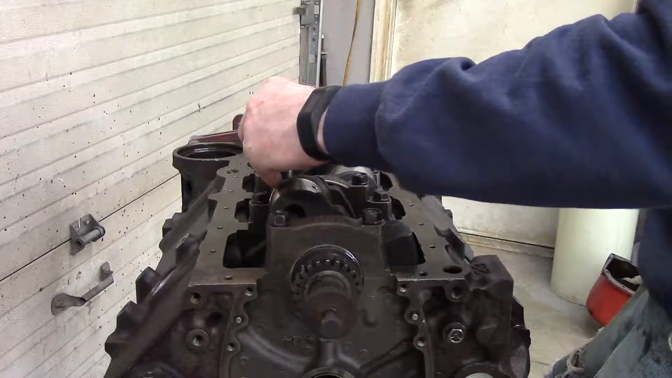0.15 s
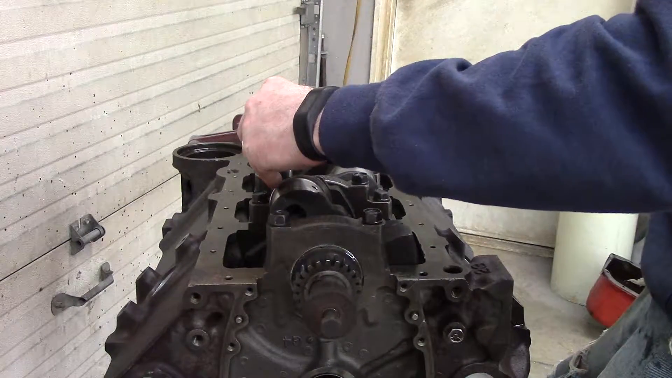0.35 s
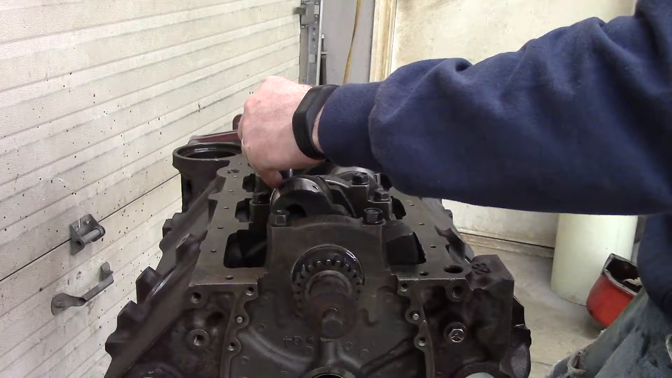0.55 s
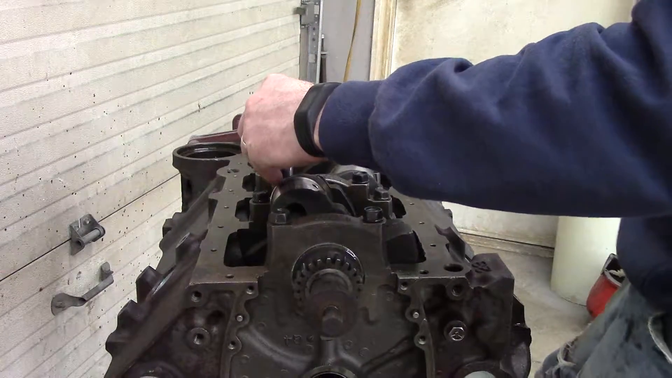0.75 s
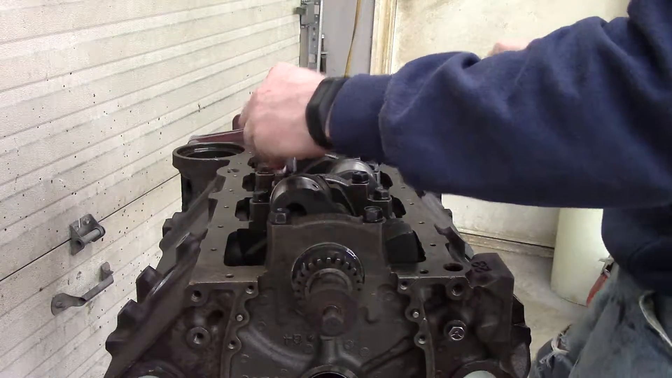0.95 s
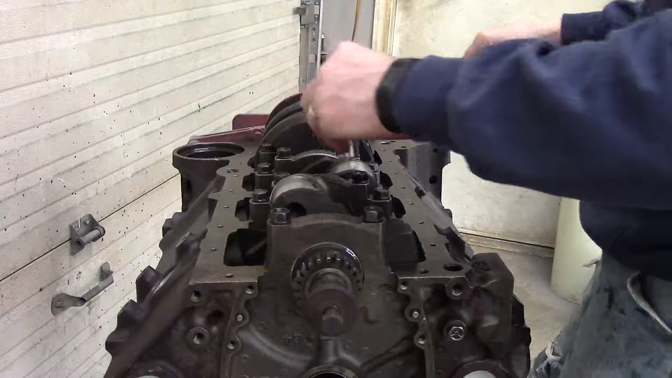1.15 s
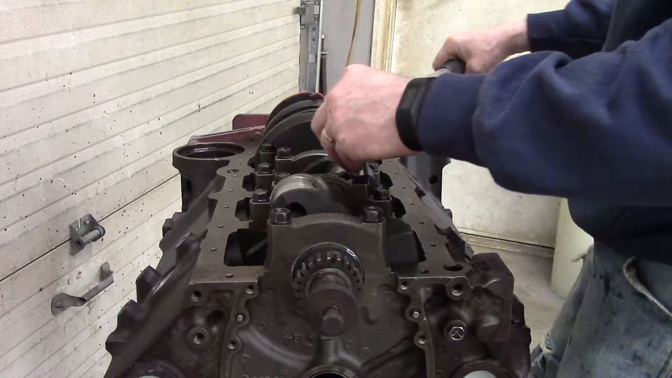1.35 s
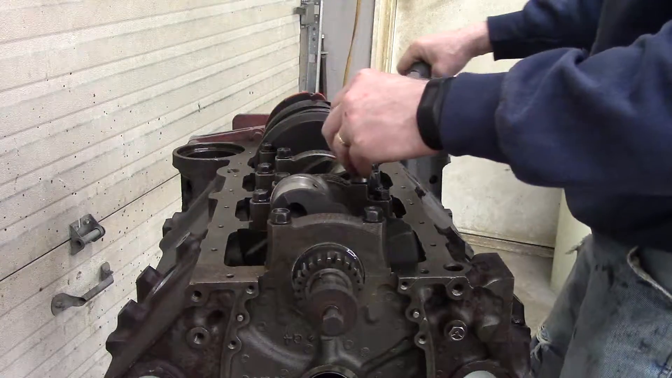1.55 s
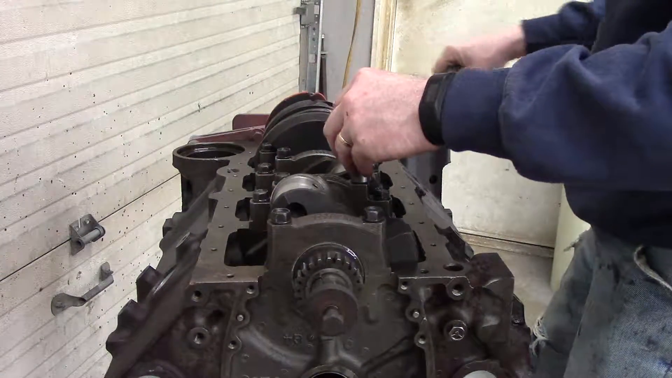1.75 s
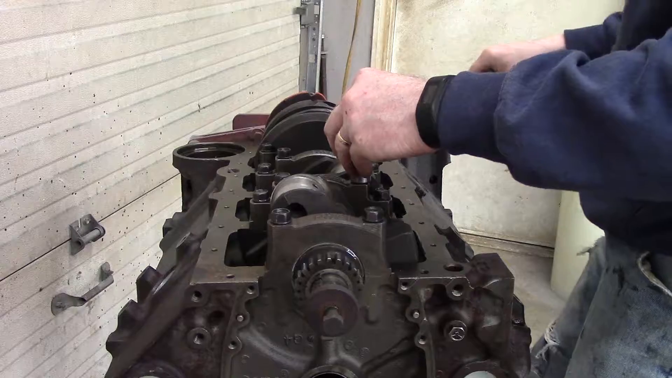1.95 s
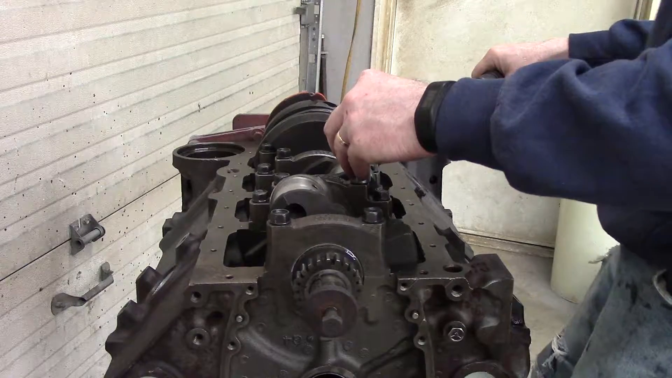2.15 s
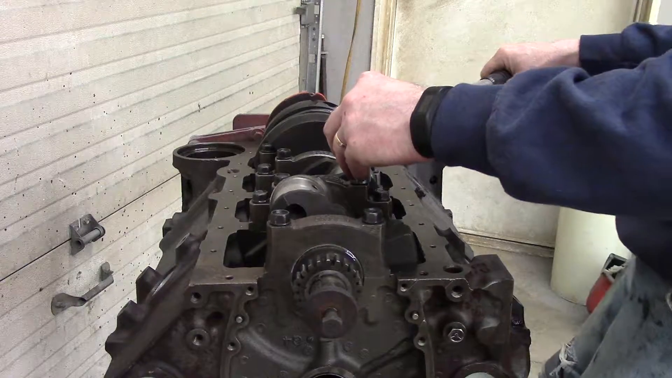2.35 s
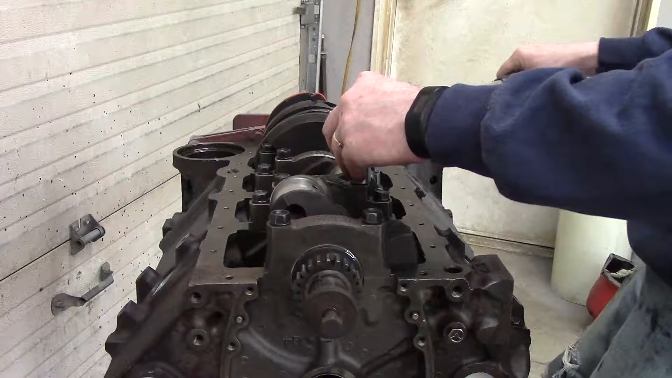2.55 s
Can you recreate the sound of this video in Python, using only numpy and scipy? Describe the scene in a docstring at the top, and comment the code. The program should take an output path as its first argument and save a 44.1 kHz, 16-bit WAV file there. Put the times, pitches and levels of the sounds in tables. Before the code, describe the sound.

A torque wrench gives a loud steel snap at about 0.25 seconds and snaps back at 0.7, each ringing briefly in a hard-walled garage. The socket clinks softly off the bolt around 1 second, then clinks onto the next from 1.35 to 1.5 seconds. A few much fainter ticks follow from 1.8 seconds on. A faint electrical hum and thin whine lie underneath throughout.

```python
"""A loud steel snap, a second snap, then light clinks, all ringing on in a hard-walled garage.
A click-type torque wrench tightens a bearing-cap bolt on an engine block: it snaps over, then snaps
back as the pull eases. The socket is lifted off and clinks onto the next bolt. Each knock of steel
on steel makes the parts ring and the room echo. Behind it lie a faint electrical hum and whine."""
import sys
import numpy as np
from scipy import signal
from scipy.fft import rfft, irfft, next_fast_len
from scipy.io import wavfile
from scipy.ndimage import map_coordinates

SR = 44100
rng = np.random.default_rng(int(sys.argv[2]) if len(sys.argv) > 2 else 0)


def wav_out(sig):
    """Save sig, one row per channel (or a flat mono array), as 16-bit PCM at SR to the path in sys.argv[1]."""
    wavfile.write(sys.argv[1], SR, np.round(np.clip(np.atleast_2d(sig).T, -1, 1) * 32767).astype(np.int16))


N = 114660


def amp(db):
    """Turn decibels into a factor to multiply by."""
    return 10 ** (np.asarray(db) / 20)


def unit(x):
    """Scale x to an average power of one."""
    return x / np.sqrt(np.mean(x ** 2) + 1e-20)


def along(points, hz):
    """Read a curve of (f/Hz, value) points at hz, on a log frequency axis."""
    f, v = np.transpose(points)
    return np.interp(np.log(hz + 1), np.log(f + 1), v)


def wobble(rate):
    """A smooth curve through `rate` random values a second."""
    return map_coordinates(rng.standard_normal(4096), [np.arange(N) * rate / SR + 2], mode="wrap")


def filtered(x, response):
    """Multiply each frequency in x by response(hz)."""
    size = next_fast_len(x.shape[-1] + SR // 2)
    return irfft(rfft(x, size) * response(np.fft.rfftfreq(size, 1 / SR)), size)[..., :x.shape[-1]]


def add(out, start, x):
    """Mix x into out, beginning at `start` seconds."""
    part = out[:, round(start * SR):][:, :x.shape[-1]]
    part += x[..., :part.shape[1]]


def stereo(pair, side_db):
    """Make left and right from a middle signal and a weaker side signal."""
    return pair[0] + amp(side_db) * np.array([pair[1], -pair[1]])


def background():
    """Soft room air, mains hum and a thin whine that swells now and then."""
    # tone colour of the room air: f/Hz, relative level/dB
    air_colour = [(15, -69), (25, -34.5), (108, -10.5), (149, -13), (242, -11.5), (326, -9.5), (354, -7.5),
                  (591, -13), (641, -14), (818, -14), (2220, -21.5), (5280, -28), (5730, -24.5),
                  (6380, -29), (16000, -37.5)]
    # tones of the mains hum: f/Hz, level/dB
    hum_tones = [(120, -78), (240, -80.5), (360, -72.5), (480, -77.5), (600, -77), (840, -81.5),
                 (1590, -77.5)]
    # starts of the whine's swells: t/s
    swell_starts = [0.214, 1.797, 1.865, 2.312, 2.395, 2.464, 2.548]
    air_top_hz, whine_hz, swell_s = 14600, 5530, .033
    t = np.arange(N) / SR
    noise = rng.standard_normal((2, N))
    air = unit(filtered(noise, lambda hz: amp(along(air_colour, hz)) / (1 + (hz / air_top_hz) ** 8)))
    hum = sum(amp(db + 2.8 * wobble(13)) * np.sin(2 * np.pi * hz * t + 0.28 * wobble(3.3))
              for hz, db in hum_tones)
    swell = sum(np.exp(-(2 * (t - start) / swell_s - 1) ** 6) for start in swell_starts)
    whine_level = amp(-80.5 + 11.5 * swell + 2.5 * wobble(22))
    whine = whine_level * np.sin(2 * np.pi * whine_hz * t + .6 * wobble(30))
    return stereo(air, side_db=-7) * amp(-60.5 + 0.99 * wobble(9.1)) + np.sqrt(2) * (hum + whine)


def garage_tail(room_db):
    """Echoes off the hard walls blend into fading noise; returns middle and side."""
    # time the room takes to fade by 60 dB (called t60): f/Hz, t60/s
    fade_times = [(150, 0.44), (500, 0.5252), (1200, 0.78), (2500, 0.76), (6000, 0.59), (9000, .5),
                  (14000, 0.39)]
    # tone colour of the echoes: f/Hz, relative level/dB
    colour = [(150, -7.5), (500, -6.5), (1200, -15.5), (2500, -13.5), (6000, -11.5), (9000, -16.5),
              (14000, -15.5)]
    t = np.arange(SR) / SR
    hz, when, bands = signal.stft(rng.standard_normal((2, SR)), SR, nperseg=256)
    fade = amp(along(colour, hz)[:, None] + room_db - 60 * when / along(fade_times, hz)[:, None])
    return signal.istft(bands * fade, SR, nperseg=256)[1][:, :SR] * (1 - np.exp(-t / .008))


def standing_waves():
    """Low notes of the room that build up between the walls after a snap."""
    # the room's low notes: f/Hz, level/dB, build-up/s, t60/s
    notes = [(197, -28, 0.092, .44), (65, -55, .05, 0.7)]
    t = np.arange(SR) / SR
    return sum(amp(db - 60 * t / t60) * (1 - np.exp(-t / rise)) ** 2 * np.sin(2 * np.pi * hz * t)
               for hz, db, rise, t60 in notes)


def thump(level_db=-56, top_hz=110, t60=.14):
    """A short, dull low thump sounds with each snap."""
    rumble = unit(filtered(rng.standard_normal(SR), lambda hz: 1 / (1 + (hz / top_hz) ** 2)))
    return rumble * amp(level_db - 60 * np.arange(SR) / SR / t60)


def ring(modes):
    """Struck metal rings at its own tones, or modes (f/Hz, level/dB, t60/s), blurred by close ones."""
    t = np.arange(SR) / SR
    blur_rate = 44  # random values a second
    out = np.zeros(SR)
    for hz, db, t60 in modes:
        phase_blur = 1.1 * wobble(blur_rate)[:SR]
        flutter_db = 2.97 * wobble(blur_rate)[:SR]
        out += amp(db + flutter_db - 60 * t / t60) * np.sin(2 * np.pi * hz * t + phase_blur)
    return out * (1 - np.exp(-t / 0.00033))


def crack(colour, tilt, edge_hz, size=2048):
    """One sharp pulse; tilt (dB per octave) brightens it, and a softer knock has a lower edge_hz."""
    radiate_hz = 450  # small steel parts give off little sound below this
    hz = np.fft.rfftfreq(size, 1 / SR)
    gain = amp(along(colour, hz) + tilt * np.log2(hz + 500)) / np.sqrt(1 + (hz / edge_hz) ** 4)
    gain = gain * (hz + 100) / np.hypot(hz + 100, radiate_hz)
    # keep the colour but pack the energy at the start (minimum phase)
    cepstrum = irfft(np.log(gain))
    cepstrum[1:size // 2] *= 2
    cepstrum[size // 2 + 1:] = 0
    pulse = irfft(np.exp(rfft(cepstrum)))
    return pulse / np.linalg.norm(pulse)


def contact(colour, tilt, edge_hz, steel_t60, near_db, near_t60, room_db, spike_db):
    """Steel hits steel: a spike, a dense short ring, echoes off block and near wall, then the garage."""
    t = np.arange(SR) / SR
    tail = garage_tail(room_db)
    steel = rng.standard_normal((2, SR)) * amp(-60 * t / steel_t60)
    steel[0, 0] += amp(spike_db)
    bounces = unit(rng.standard_normal((2, SR)) * (rng.random(SR) < .06))
    echoes = bounces * amp(near_db - 60 * t / near_t60) * (1 - np.exp(-t / 0.0016))
    pulses = [crack(colour, tilt, edge_hz), crack(colour, tilt + 2, edge_hz)]  # middle, brighter side
    middle_and_side = signal.fftconvolve(steel + echoes + tail, pulses, axes=1)[:, :SR]
    return stereo(middle_and_side, side_db=-17)


def socket():
    """The socket slips off one bolt and drops onto the next, ringing at each touch."""
    # touches on the bolt heads: t/s, level/dB, tilt/(dB per octave), treble edge/Hz, relative ring/dB
    clinks = [(0.920, -43.5, 3, 9000, -10), (0.992, -37.5, -7, 6000, -10), (0.999, -38, -1, 11000, -9),
              (1.3473, -34, -0.5, 6000, 0), (1.3504, -37.5, -2, 5500, 0.5), (1.368, -43, -2, 4480, 0.5),
              (1.4608, -32, -0.5, 8000, -6.5), (1.4653, -34.5, 0, 8000, -6),
              (1.4854, -27.5, 1.5, 12000, -2), (1.4890, -28.5, 0.5, 12000, -5.5),
              (1.4935, -30.5, 4, 9000, -5), (1.801, -49, -3.5, 5000, -9), (1.909, -54.5, -2.5, 2580, -13.5),
              (2.25, -62, -2, 3000, -14.5), (2.448, -64, -3, 2500, -14.5)]
    # tone colour of a clink: f/Hz, relative level/dB
    colour = [(310, -40.5), (520, -21.5), (804, -19), (939, -12.5), (1190, -14.5), (1840, -4), (2040, -9.5),
              (2480, -5.5), (2770, -16), (2930, -6.5), (3420, -4.5), (4940, -12), (6540, -11), (8670, -25),
              (10300, -25.5), (15000, -48)]
    # ringing tones of the loose socket: f/Hz, relative level/dB, t60/s
    modes = [(943, -10.5, .1), (1770, -24, 0.7), (2290, -15, 0.18), (2510, -19, .3), (3372, -7.5, 0.22),
             (3440, -17.5, .5), (3480, -21, 0.28), (3840, -46, 0.3), (4570, -23, .35), (5780, -30.5, 0.62),
             (6260, -26, 0.24)]
    out = np.zeros((2, N))
    for start, db, tilt, edge_hz, ring_db in clinks:
        hit = contact(colour, tilt, edge_hz, steel_t60=0.033,
                      near_db=-5, near_t60=0.13, room_db=-2.5, spike_db=11.5)
        add(out, start, amp(db) * (hit + amp(ring_db) * ring(modes)))
    return out


def wrench():
    """The wrench snaps over and back, each time with three quick knocks that ring tool and block."""
    # knocks of the snap over and the snap back: t/s, level/dB, tilt/(dB per octave)
    over_knocks = [(0.2491, -13, -2), (0.2506, -11.5, 0), (0.2542, -15, 2.5)]
    back_knocks = [(0.6860, -10.5, -0.19), (0.6888, -15.5, 0.53), (0.6935, -14, 2.6)]
    # tone colour of each snap: f/Hz, relative level/dB
    over_colour = [(150, -57), (260, -24.5), (392, -26.5), (457, -13.5), (533, -19), (591, -12.5),
                   (666, -15.5), (832, -13), (1040, -3), (1230, -11.5), (1460, -15), (2210, -0.5),
                   (2360, -6.5), (3160, -7.5), (3380, -11), (4220, -6), (4840, -14.5), (6370, -7.5),
                   (9940, -22.5), (10800, -13.5), (15500, -36.5)]
    back_colour = [(150, -60), (260, -25), (325, -19), (385, -26), (457, -13), (542, -20), (601, -14),
                   (666, -19), (832, -14.5), (1020, -1.5), (1170, -15), (1570, -12), (1960, -1),
                   (2130, -10.5), (2570, -7.5), (2950, -18), (3320, -8.5), (3950, -11.5), (5370, -10.5),
                   (5750, -11.5), (6260, -9.5), (10100, -20), (11200, -21.5), (13800, -32.5), (15500, -48)]
    # ringing tones of wrench and socket: f/Hz, relative level over/dB, relative level back/dB, t60/s
    tool_modes = [(1003.5, -35.5, -33, .5), (1081, -32.5, -43, .55), (1340, -39.5, -44, 0.59),
                  (1758, -36.5, -44, 0.47), (1938, -39.5, -31, .6), (2032, -35.5, -38.5, .6),
                  (2200, -27, -45.5, .55), (2320, -32.5, -61, .5), (2590, -40.5, -35.5, .45),
                  (2780, -45.5, -33.5, 0.32), (2895, -36.5, -51, .45), (3026, -33, -55.5, .5),
                  (3290, -39.5, -35.5, 0.5), (3565, -50, -36.5, .45), (4244, -27.5, -39, .48),
                  (4310, -38.5, -42, 0.9), (4590, -37, -39.5, 0.68), (5440, -44, -31.5, 0.72),
                  (5480, -50, -34.5, 0.22), (6330, -24, -20.5, 0.17), (6630, -36, -35, 0.42),
                  (7130, -27.5, -39.5, .25), (8630, -46, -34, .35), (10650, -38.5, -46, 0.49),
                  (10960, -34.5, -36.5, 0.12)]
    # ringing tones of the engine block: f/Hz, level/dB, t60/s
    block_modes = [(465, -50, .25), (572, -50, 0.28), (890, -43, .25)]
    # one tiny high ping of the wrench: t/s, f/Hz, level/dB, t60/s
    ping = (0, 10603.5, -64, 0.1)
    ring_db = 1
    over_modes = [(hz, db + ring_db, t60) for hz, db, _, t60 in tool_modes]
    back_modes = [(hz, db + ring_db, t60) for hz, _, db, t60 in tool_modes]
    snaps = (over_knocks, over_colour, over_modes), (back_knocks, back_colour, back_modes)
    out = np.zeros((2, N))
    for knocks, colour, modes in snaps:
        for start, db, tilt in knocks:
            hit = contact(colour, tilt, edge_hz=18000, steel_t60=0.043,
                          near_db=-5.5, near_t60=.15, room_db=-1.5, spike_db=13)
            add(out, start, amp(db) * hit)
        snap_start = knocks[0][0]
        add(out, snap_start, ring(modes) + ring(block_modes) + standing_waves() + thump())
    add(out, ping[0], ring([ping[1:]]))
    return out


def scene():
    """Wrench and socket sound from almost straight ahead, over the quiet background."""
    right_delay_s, right_boost_db = 0.000004, 0.5  # compared with the left
    sides = np.array([[1], [-1]])  # left, right
    tools = filtered(wrench() + socket(), lambda hz: np.exp(1j * np.pi * hz * right_delay_s * sides))
    return (tools + background()) * amp(-sides * right_boost_db / 2)


def record(dry):
    """Round off the tallest peaks and cut away the very highest treble."""
    top_hz = 15800
    rounded = dry / (1 + np.abs(dry) ** 8) ** (1 / 8)
    return filtered(rounded, lambda hz: 1 / np.sqrt(1 + (hz / top_hz) ** 160))


dry = scene()
out = record(dry)
wav_out(out)
```